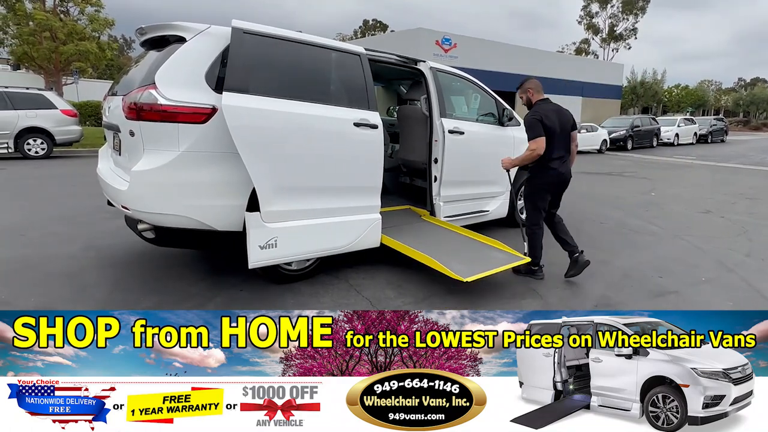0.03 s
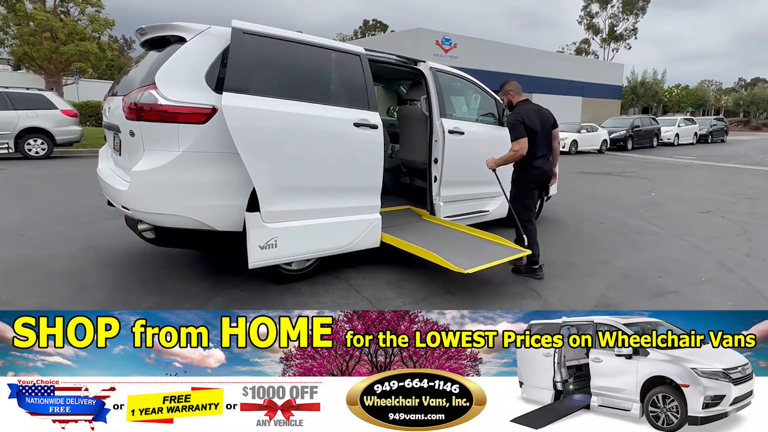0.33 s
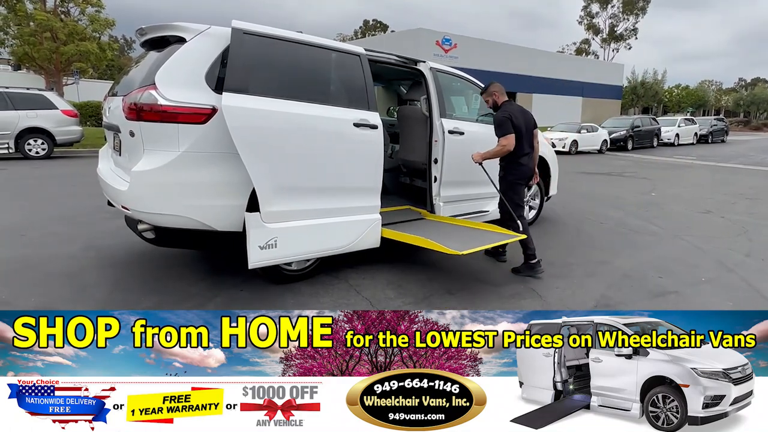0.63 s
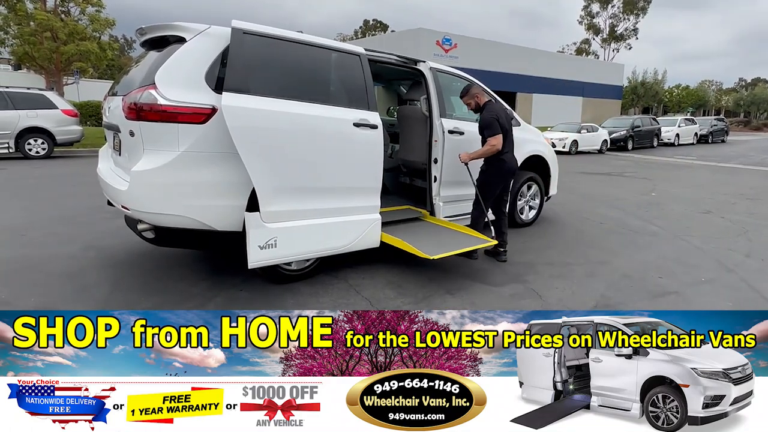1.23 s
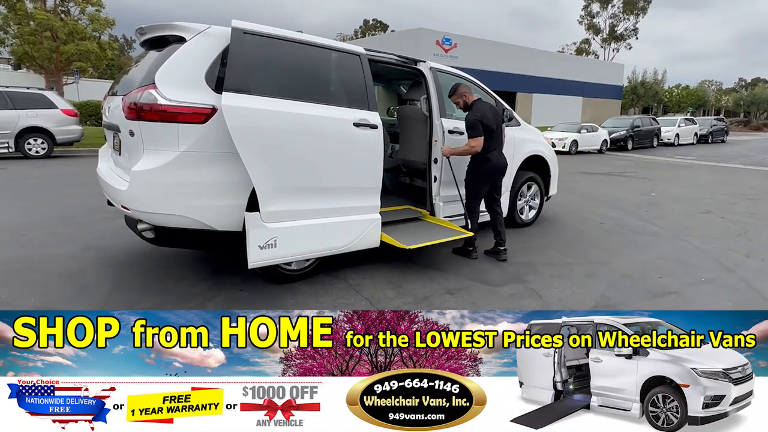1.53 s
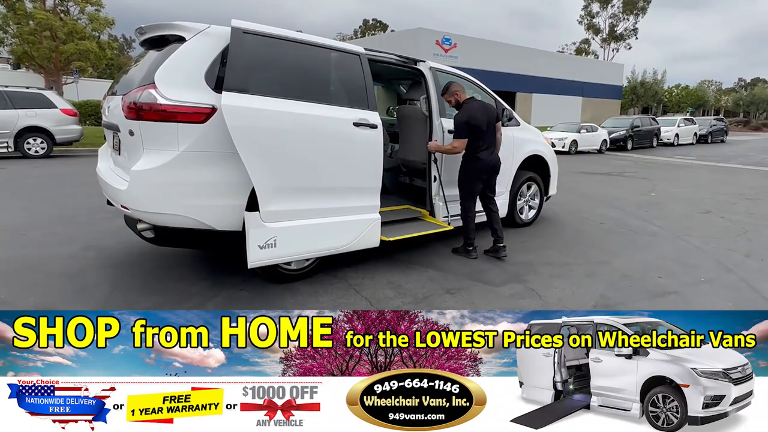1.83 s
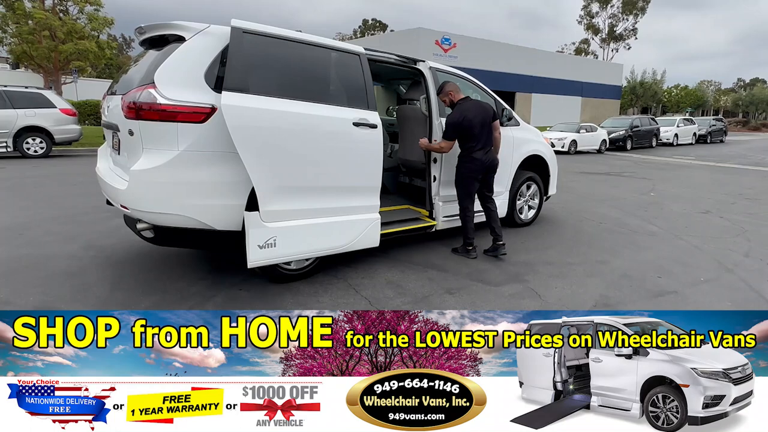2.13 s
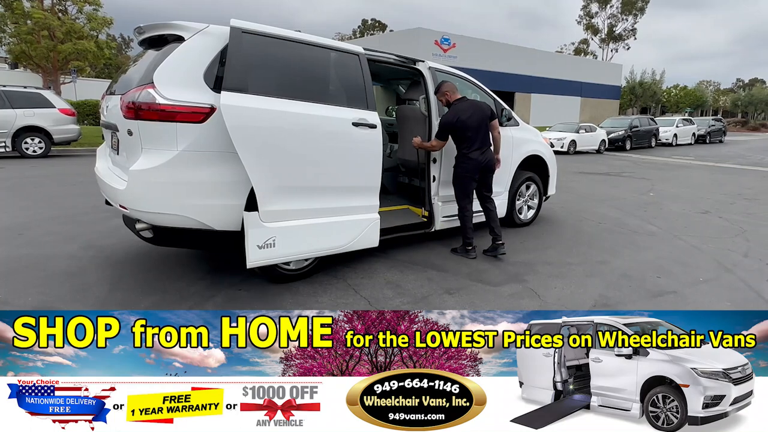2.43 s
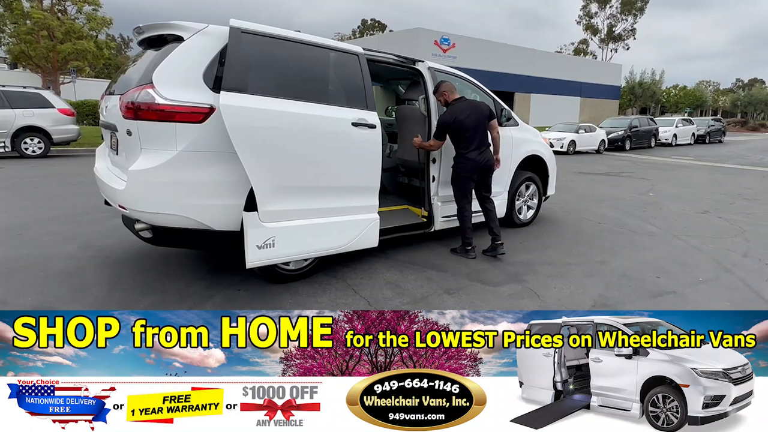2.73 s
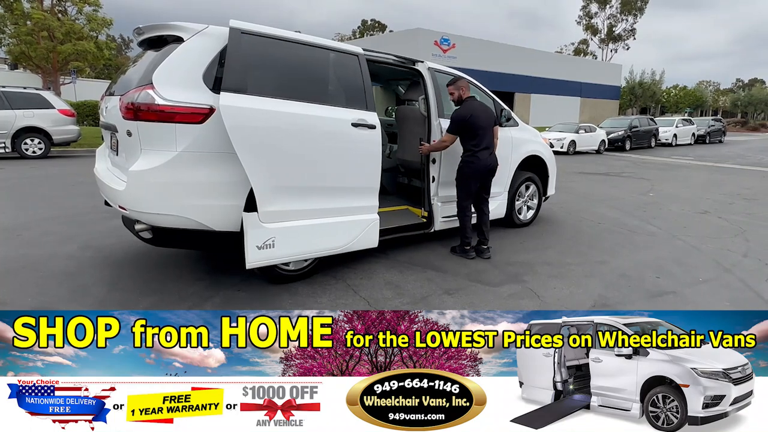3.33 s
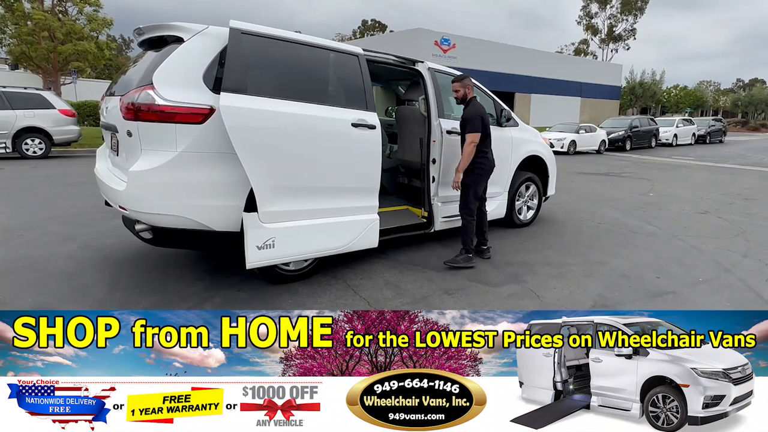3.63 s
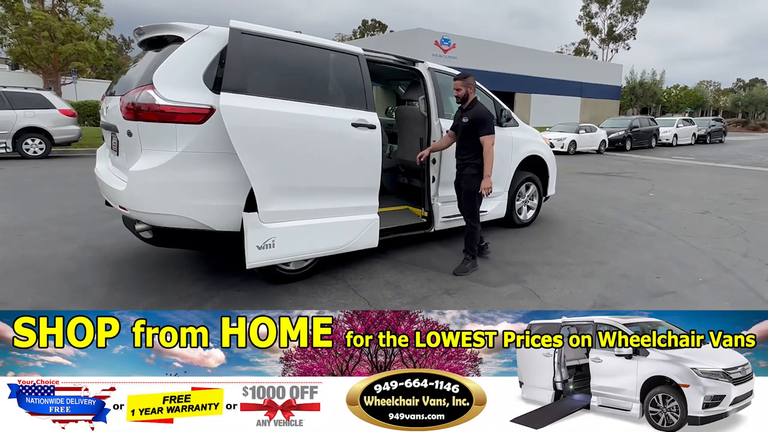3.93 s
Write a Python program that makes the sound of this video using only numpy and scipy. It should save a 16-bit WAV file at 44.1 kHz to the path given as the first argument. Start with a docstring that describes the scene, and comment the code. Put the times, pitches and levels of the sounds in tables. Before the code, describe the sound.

Metal van ramp pushed in by hand, knocking and scraping until it clunks home.

```python
"""Van ramp in a parking lot

A metal ramp is lifted by hand and pushed into the floor of a van, heard on a stereo microphone pair.
Friction and knocks set the floor, deck and guide rails rumbling and scraping; a guide briefly squeals,
steel fittings click, and the ramp meets the end stop with a clunk that booms in the van body.
Two footsteps thump softly, a light breeze is on the microphones; far off, traffic hums, a bird chirps."""
import sys
import numpy as np
from scipy.fft import rfft, irfft
from scipy.io import wavfile
from scipy.ndimage import map_coordinates

SR = 44100
rng = np.random.default_rng(int(sys.argv[2]) if len(sys.argv) > 2 else 0)


def store_pcm(level_fs):
    """Save levels as 16-bit WAV."""
    pcm = np.round(np.clip(level_fs, -1, 1) * 32767).astype(np.int16)
    wavfile.write(sys.argv[1], SR, np.atleast_2d(pcm).T)


N = 176400

# knocks of the ramp and its handling (time [s], floor drive [dB], deck drive [dB], clatter drive [dB])
KNOCKS = [(.383, -52, -50, -55), (0.51, -38, -36.5, -53), (0.543, -38, -70, -50), (0.756, -37.5, -46, -68),
          (1.022, -43.5, -39, -63), (1.122, -39.5, -37, -52.5), (1.156, -36, -31.5, -65),
          (1.187, -30.5, -52, -47), (1.203, -38.5, -30, -44.5), (1.246, -38.5, -40, -38.5),
          (1.32, -31.5, -38, -50.5), (1.413, -33, -38.5, -42.5), (2.353, -33, -41, -53.5),
          (2.387, -28, -57, -53), (2.419, -32, -50, -42.5), (2.449, -34.5, -36, -46),
          (2.513, -40, -66, -49), (2.559, -31, -33, -40.5), (2.571, -44, -32, -41),
          (2.597, -32.5, -38, -44.5), (2.619, -30.5, -38, -45.5), (2.663, -37.5, -43.5, -45),
          (2.703, -48.5, -48, -51.5), (2.987, -46, -50.5, -59.5)]
# spectrum of clattering metal (frequency [Hz], relative level [dB])
CLATTER_COLOUR = [(300, -42), (1000, -8), (1500, -2.5), (2400, 0), (3600, -4.5), (4600, -5), (7000, -6),
                  (9500, -19.5), (13000, -50), (16000, -33)]
KNOCK_RISE_S, CLICK_RISE_S = .0018, .0006


def ramp():
    """Sliding friction and knocks ring the van floor, the ramp's deck and the guide rails."""
    # friction driving the floor, the deck and the rails (time [s], level [dB])
    rumble = [(.5, -46.5), (.56, -54), (.68, -48.5), (.78, -48), (1.1, -45), (1.2, -38), (1.36, -39.5),
              (1.5, -41.5), (1.64, -41), (1.76, -47.5), (1.98, -44.5), (2.1, -39), (2.26, -51), (2.34, -47),
              (2.42, -66), (2.5, -40.5), (2.7, -45.5), (2.9, -55.5), (3.05, -52), (3.5, -72)]
    drone = [(.5, -53), (.7, -60.5), (.77, -49), (.95, -52.5), (1.1, -52), (1.2, -47), (1.33, -42),
             (1.48, -44.5), (1.6, -37.5), (1.75, -47.5), (1.85, -47.5), (2.1, -48), (2.28, -57),
             (2.42, -53), (2.55, -48.5), (2.72, -52.5), (2.9, -74)]
    scrape = [(.5, -70.5), (1.1, -59.5), (1.22, -52), (1.36, -54), (1.6, -48.5), (1.74, -55.5), (1.84, -52),
              (2.1, -57.5), (2.26, -62.5), (2.52, -57), (2.72, -58.5), (2.9, -71)]
    # modes of the same three parts (frequency [Hz], width [Hz], relative level [dB])
    floor_modes = [(123.6, 28.5, -1), (163.2, 10.1, 0), (191.4, 9, -1), (238, 25.4, -0.5), (287.6, 23, 0.5),
                   (322.7, 26, -2.5), (386.4, 58, -4.5)]
    deck_modes = [(526, 42, -7), (605, 52, 2), (646, 63, 3), (748, 51.5, 3), (842, 20.2, 4), (906.6, 37, 0),
                  (1037, 285, -11)]
    rail_modes = [(1303, 110, -2.5), (1550, 100, 2), (1733, 40, 3.5), (1933, 120, -4), (2185, 74, -0.5),
                  (2415, 113, -3.5), (2845, 150, -2.5), (3546, 220, -8), (3970, 320, -12), (5260, 500, -12)]
    times, floor_db, deck_db, clatter_db = np.transpose(KNOCKS)

    def ring(slide, knock_db, modes, t60):
        drive = level(slide) * friction() + bursts(times, knock_db, KNOCK_RISE_S, t60)
        return filtered(drive, resonances(modes))

    floor = ring(rumble, floor_db, floor_modes, t60=.13)
    deck = ring(drone, deck_db, deck_modes, t60=.083)
    rails = ring(scrape, clatter_db - 5.5, rail_modes, t60=.16)
    crash = filtered(bursts(times, clatter_db - 6, KNOCK_RISE_S, t60=.16), colour(CLATTER_COLOUR))
    return floor + deck + rails + crash


def clanks(count=10):
    """Each knock meets the metal at a new spot and rings its own handful of partials."""
    low_hz, high_hz = 2000, 7500
    out, t = np.zeros(N + SR), np.arange(SR // 4) / SR
    for (start, _, _, db), (offset, phase) in zip(KNOCKS, rng.random((len(KNOCKS), 2, count, 1))):
        hz = low_hz * (high_hz / low_hz) ** ((np.arange(count)[:, None] + offset) / count)
        partials = amp(along(CLATTER_COLOUR, hz)) * np.sin(2 * np.pi * (hz * t + phase))
        ring = unit(partials.sum(axis=0))
        out[round(start * SR):][:len(t)] += ring * struck(t, db - 2, KNOCK_RISE_S, t60=.1)
    return out[:N]


def end_stop():
    """The van body booms as the ramp comes home, then lower as it settles."""
    # booms of the body (time [s], pitch [Hz], level [dB])
    booms = [(2.58, 181.8, -24), (2.627, 136, -28.5)]
    out = np.zeros(N)
    for start, hz, db in booms:
        t = np.maximum(clock() - start, 0)
        out += struck(t, db, rise=.0022, t60=.19) * np.sin(2 * np.pi * hz * t)
    return out


def fittings():
    """Hard steel contacts: a bright snap, and a short ring that a wall across the lot sends back."""
    # clicks of the fittings (time [s], ring level [dB], snap level [dB])
    clicks = [(0.5421, -44.5, -41), (1.125, -53, -41), (1.183, -47, -38.5), (1.19, -45.5, -41),
              (1.245, -29, -23), (1.411, -23, -28.5), (2.416, -41, -35.5), (2.56, -39.5, -67),
              (2.663, -55, -54.5), (2.986, -50.5, -61)]
    # modes of the fittings (frequency [Hz], width [Hz], relative level [dB])
    steel_modes = [(2360, 130, -0.5), (3640, 76, -1.5), (4280, 230, -7.5), (5280, 610, -7.5),
                   (6870, 290, 1.5), (7720, 980, -0.5)]
    # spectrum of the snap (frequency [Hz], relative level [dB])
    snap_colour = [(3000, -32), (9500, -15), (10900, -5), (12700, 0), (15300, 0), (16500, -15)]
    times, ring_db, snap_db = np.transpose(clicks)

    def strike(db):
        contact = bursts(times, db, CLICK_RISE_S, t60=.012)
        tail = bursts(times, db - 15, KNOCK_RISE_S, t60=.066)
        return contact + tail

    echo = bursts(times + .0318, ring_db - 18.5, CLICK_RISE_S, t60=.084)
    ring = filtered(strike(ring_db) + echo, resonances(steel_modes))
    return ring + filtered(strike(snap_db), colour(snap_colour))


def squeal():
    """Stick-slip in a guide: short unsteady tones with a weak octave."""
    # squeals (time [s], length [s], starting pitch [Hz], glide [Hz/s], level [dB])
    squeals = [(1.366, 0.026, 2940, 0, -51.5), (1.508, 0.031, 3500, -4000, -39.5),
               (1.525, 0.063, 3555, 3000, -48.5), (1.595, 0.057, 3760, 394, -42.5),
               (1.607, .036, 4015, -2000, -47.5), (1.65, 0.02, 3690, -4000, -40.5),
               (1.663, .062, 3724, -1600, -50), (1.721, 0.073, 3750, -900, -54),
               (1.743, 0.019, 3696, -2000, -47.5), (1.79, .065, 3640, 0, -61.5)]
    jitter, flutter_db, octave_db = .018, 3, -22
    out = np.zeros(N)
    for start, length, hz, glide, db in squeals:
        progress = np.clip((clock() - start) / length, 0, 1)
        phase = phase_of((hz + glide * progress * length) * (1 + jitter * wobble(1100)))
        out += amp(db) * arch(progress) * (np.sin(phase) + amp(octave_db) * np.sin(2 * phase))
    return out * amp(flutter_db * wobble(270)) * pan_left(5)


def loose_hardware():
    """Loose metal parts on the ramp ping with two partials."""
    # pings (time [s], pitch [Hz], level [dB])
    pings = [(1.128, 2110, -45.5), (2.395, 2230, -43), (2.428, 3010, -42.5), (2.565, 3740, -38),
             (2.58, 2430, -42), (2.622, 2400, -43), (2.666, 2800, -46)]
    upper_ratio, upper_db = 1.47, -7
    out, t = np.zeros(N + SR), np.arange(SR // 4) / SR
    for start, hz, db in pings:
        ring = np.sin(2 * np.pi * hz * t) + amp(upper_db) * np.sin(2 * np.pi * upper_ratio * hz * t)
        out[round(start * SR):][:len(t)] += ring * struck(t, db, rise=.0012, t60=.03)
    return out[:N] * pan_left(2)


def dry_ticks():
    """Light, dry ticks of the ramp's hardware, and a last scuff of a shoe."""
    # ticks and the closing scuff (time [s], level [dB])
    ticks = [(.436, -57), (2.515, -43.5), (2.594, -44.5), (2.746, -59), (2.783, -52.5), (2.819, -58),
             (2.944, -61.5), (2.987, -47.5), (3.798, -58.5)]
    # their spectrum (frequency [Hz], relative level [dB])
    tick_colour = [(1000, -6), (2400, 4), (7500, -4), (10000, -34), (16000, -30.5)]
    times, dbs = np.transpose(ticks)
    return filtered(bursts(times, dbs, CLICK_RISE_S, t60=.022), colour(tick_colour))


def rubbing():
    """The strap brushes the ramp as it is pulled taut; sliding surfaces hiss and the guides sizzle."""
    # course of each rub (time [s], level [dB])
    strap_levels = [(.39, -51), (.44, -57), (.5, -61)]
    hiss_levels = [(.6, -89.5), (1.1, -73), (1.25, -69), (1.6, -64.5), (1.85, -68.5), (2.1, -64),
                   (2.4, -70), (2.55, -64.5), (2.75, -110)]
    sizzle_levels = [(1.1, -96), (1.25, -55), (1.4, -71.5), (1.82, -68.5), (2.05, -94)]
    # spectrum of each rub (frequency [Hz], relative level [dB])
    strap_colour = [(1000, 9), (3000, -2), (6000, -10.5), (11000, -20), (14700, -14), (16000, -24)]
    hiss_colour = [(2500, -6.5), (5000, 7.5), (7400, 10.5), (9000, -2.5), (11000, -7.5), (13000, -29),
                   (16000, -29)]
    sizzle_colour = [(7000, 7.5), (11000, -34), (13000, -3.5), (14700, 8.5), (16200, -16.5)]
    strap = filtered(level(strap_levels) * friction(), colour(strap_colour))
    hiss = filtered(level(hiss_levels) * noise(), colour(hiss_colour))
    sizzle = filtered(level(sizzle_levels) * friction(), colour(sizzle_colour))
    return strap + hiss + sizzle


def footsteps():
    """Two soft, low footstep thumps."""
    # thumps (time [s], half length [s], level [dB])
    thumps = [(0.032, 0.029, -40), (3.698, 0.015, -35)]
    thump_hz = 53.8
    out = np.zeros(N)
    for centre, half_length, db in thumps:
        t = clock() - centre
        out += amp(db) * np.exp(-(t / half_length) ** 2) * np.sin(2 * np.pi * thump_hz * t)
    return out * pan_left(1.5)


def wind():
    """A light breeze on the microphones: low gusts, different on each."""
    # strength of the breeze (time [s], level [dB])
    breeze = [(0, -43), (.3, -54.5), (.45, -48.5), (1.9, -52.5), (2.15, -55), (2.28, -39), (2.45, -47.5),
              (2.58, -40.5), (2.85, -47.5), (3.3, -46), (3.55, -50), (4, -46)]
    # spectrum of the gusts (frequency [Hz], relative level [dB])
    wind_colour = [(20, -42.5), (35, -12), (58, 0), (85, -2), (130, -12.5), (300, -32), (1000, -101)]
    return level(breeze) * filtered(noise(), colour(wind_colour)) * pan_left(1.5)


def traffic():
    """A steady wash of distant traffic, with one engine's wavering hum slowly fading."""
    # spectrum of the wash (frequency [Hz], relative level [dB])
    wash_colour = [(20, -31.5), (40, -26.5), (72, -5.5), (130, -10.5), (195, -14), (260, -15.5), (370, -21),
                   (550, -25), (800, -21), (1400, -28.5), (1950, -32), (2900, -46), (5200, -48),
                   (8000, -60), (11000, -70), (16000, -93.5)]
    # how alike the lot sounds on the two microphones (frequency [Hz], likeness [-1..1])
    lot_likeness = [(60, 0.18), (290, 0.83), (640, -0.61), (1400, 0.12), (4000, 0.019)]
    # the lot's balance across the pair (frequency [Hz], left minus right [dB])
    lot_balance = [(200, 0.5), (700, 4.5), (2000, 4.5), (4400, 8)]
    hum_hz, octave_db, fade_db_per_s = 126.5, -4.5, 2.5
    wash = microphone_pair(filtered(noise(), colour(wash_colour)), lot_likeness, lot_balance, lead_s=0)
    wash *= amp(-52.5 + .34 * wobble(6.64))
    phase = phase_of(hum_hz * (1 + .02 * wobble(12)))
    hum = np.sin(phase) + amp(octave_db) * np.sin(2 * phase)
    return wash + hum * amp(-54 - fade_db_per_s * clock() + 1.2 * wobble(5.7))


def bird():
    """Faint downward whistles from across the lot."""
    # chirps (time [s], length [s], starting pitch [Hz], final pitch [Hz], level [dB])
    chirps = [(2.835, .075, 5300, 3400, -74), (3.255, .105, 4700, 2950, -80)]
    jitter, flutter_db = .035, 4
    out = np.zeros(N)
    for start, length, start_hz, end_hz, db in chirps:
        progress = np.clip((clock() - start) / length, 0, 1)
        hz = (start_hz + (end_hz - start_hz) * progress) * (1 + jitter * wobble(900))
        out += amp(db) * arch(progress) * np.sin(phase_of(hz))
    return out * amp(flutter_db * wobble(90)) * pan_left(3)


def friction():
    """Tiny slips of uneven size, bunched by the ramp's judder."""
    slips_per_s, spread_db, judder_db = 9000, 2, 2
    slips = (rng.random(N) < slips_per_s / SR) * amp(spread_db * rng.standard_normal(N))
    return unit(slips * noise() * amp(judder_db * wobble(45)))


def bursts(times, dbs, rise, t60):
    """The chatter of each contact: noise that rises quickly and dies away."""
    power, t = np.zeros(N + SR), np.arange(SR // 2) / SR
    for start, db in zip(times, dbs):
        power[round(start * SR):][:len(t)] += struck(t, db, rise, t60) ** 2
    return np.sqrt(power[:N]) * noise()


def microphone_pair(pair, likeness, balance, lead_s):
    """Two unrelated signals become left and right: partly alike, uneven in level, left lead_s early."""
    hz = frequencies()
    angle = np.arccos(np.clip(along(likeness, hz), -1, 1)) / 2
    mid, side = filtered(pair, np.array([np.cos(angle), np.sin(angle)]))
    lean = amp(along(balance, hz) / 2) * np.exp(1j * np.pi * hz * lead_s)
    rms_gain = np.sqrt((abs(lean) ** 2 + abs(lean) ** -2) / 2)
    return filtered(np.array([mid + side, mid - side]), np.array([lean, 1 / lean]) / rms_gain)


def resonances(modes):
    """Causal response of unit power from modes of alternating sign, rolled off at both ends."""
    f = frequencies()
    response = sum((-1) ** k * amp(db) * 1j * f * width / (hz * hz - f * f + 1j * f * width)
                   for k, (hz, width, db) in enumerate(modes))
    response /= (1 + 1j * f / (2 * modes[-1][0])) ** 2
    response *= 1j * f / (1j * f + modes[0][0] / 2)
    return response / np.sqrt(np.mean(abs(response) ** 2))


def colour(points):
    """Minimum-phase response of unit power from (frequency [Hz], level [dB]) points."""
    cepstrum = irfft(np.log(unit(amp(along(points, frequencies())))))
    cepstrum[1:N] *= 2
    cepstrum[N + 1:] = 0
    return np.exp(rfft(cepstrum))


def struck(t, db, rise, t60):
    """Envelope of a blow: a quick rise, then a fall of 60 dB every t60 seconds."""
    return (1 - np.exp(-t / rise)) * amp(db - 60 * t / t60)


def level(points):
    """Gain per sample from (time [s], level [dB]) points, silent outside them."""
    times, dbs = np.transpose(points)
    t = clock()
    return np.where((t >= times[0]) & (t <= times[-1]), amp(np.interp(t, times, dbs)), 0)


def along(points, hz):
    """Interpolate (frequency [Hz], value) points on a log axis."""
    knots_hz, values = np.transpose(points)
    return np.interp(np.log(hz + 1), np.log(knots_hz + 1), values)


def wobble(rate):
    """A smooth random curve, rate knots a second."""
    return map_coordinates(rng.standard_normal(N // 8), [clock() * rate], mode="wrap")


def pan_left(db):
    """Gains that raise the left microphone and lower the right by db each."""
    return amp([[db], [-db]])


def arch(progress):
    return np.sqrt(4 * progress * (1 - progress))


def phase_of(hz):
    return 2 * np.pi * np.cumsum(hz) / SR


def filtered(x, response):
    return irfft(rfft(x, 2 * N) * response, 2 * N)[..., :N]


def noise():
    return rng.standard_normal((2, N))


def amp(db):
    return 10 ** (np.asarray(db) / 20)


def unit(x):
    return x / np.sqrt(np.mean(x ** 2) + 1e-20)


def clock():
    return np.arange(N) / SR


def frequencies():
    return np.fft.rfftfreq(2 * N, 1 / SR)


def scene():
    """The van, leaning left on the microphone pair, with the open lot behind it."""
    # how alike the van sounds on the two microphones (frequency [Hz], likeness [clipped to -1..1])
    van_likeness = [(100, 1.1), (350, .88), (700, -0.36), (1200, 0.5), (2500, -0.04), (6000, 0.02),
                    (12000, 1.25)]
    # the van's balance across the pair (frequency [Hz], left minus right [dB])
    van_balance = [(200, 0), (420, -1), (780, 9.5), (1130, 0), (1500, 4), (2400, 4), (3300, 14.5),
                   (7800, 6), (10500, -3), (15000, 0.5)]
    contacts = ramp() + np.array([clanks(), clanks()]) + rubbing() + fittings() + dry_ticks()
    van = microphone_pair(contacts, van_likeness, van_balance, lead_s=.0002144)
    return van + loose_hardware() + end_stop() + squeal() + footsteps() + bird() + traffic() + wind()


def record(dry):
    """The recorder keeps nothing above its band limit."""
    top_hz = 16500
    return filtered(dry, frequencies() < top_hz)


dry = scene()
out = record(dry)
store_pcm(out)
```